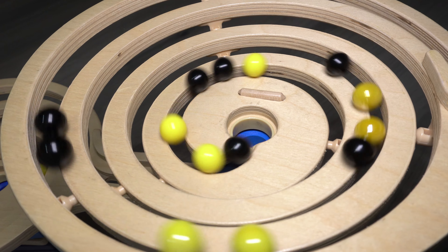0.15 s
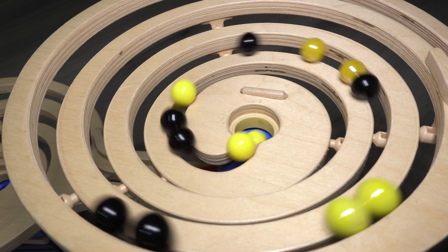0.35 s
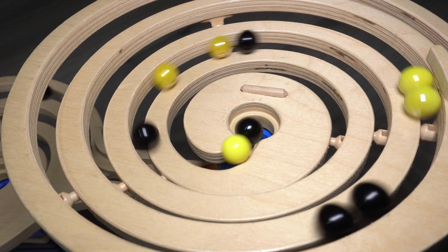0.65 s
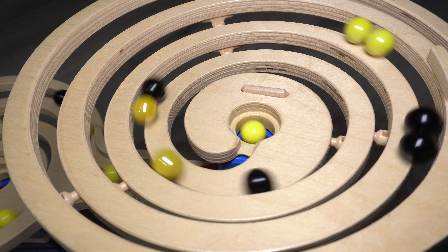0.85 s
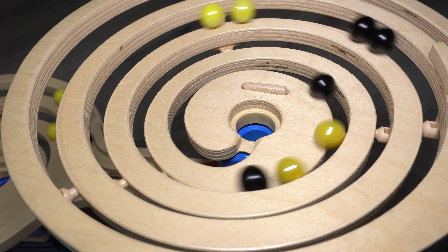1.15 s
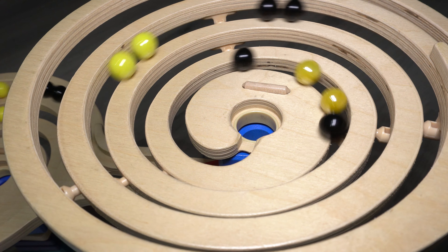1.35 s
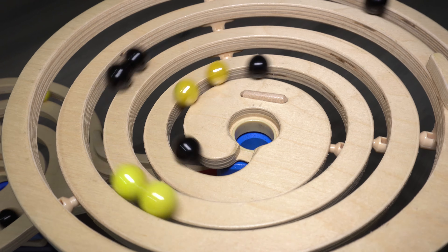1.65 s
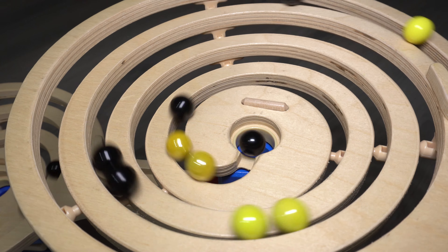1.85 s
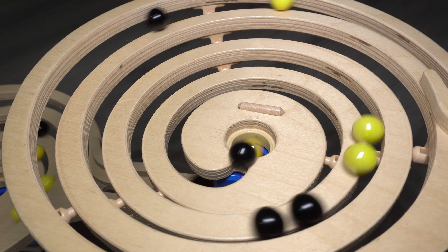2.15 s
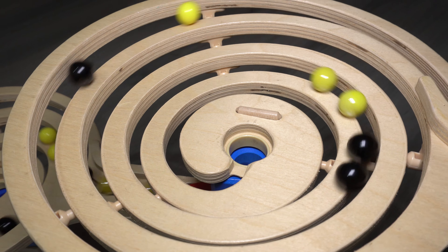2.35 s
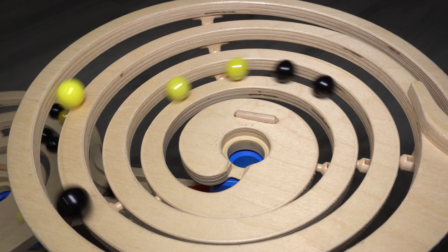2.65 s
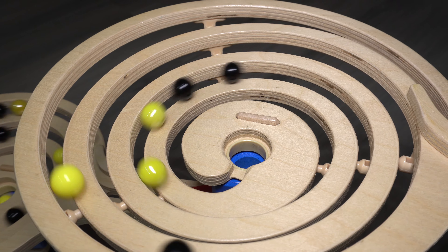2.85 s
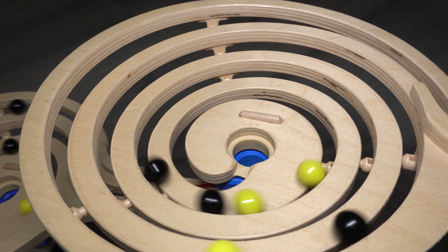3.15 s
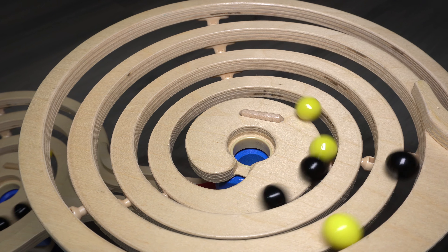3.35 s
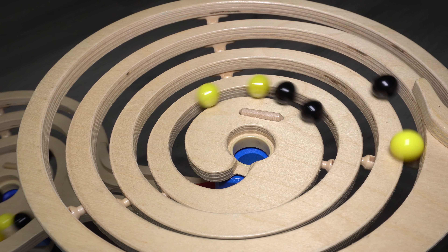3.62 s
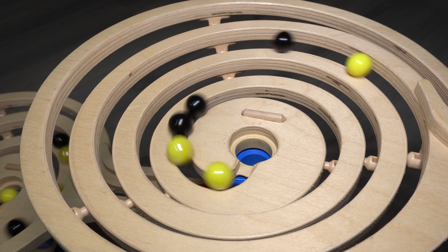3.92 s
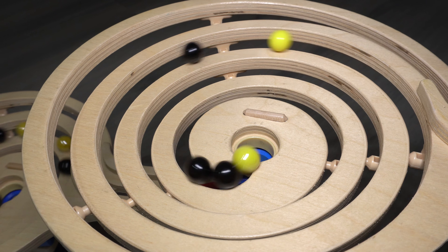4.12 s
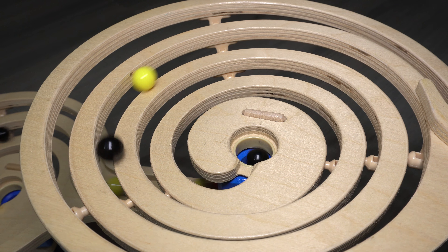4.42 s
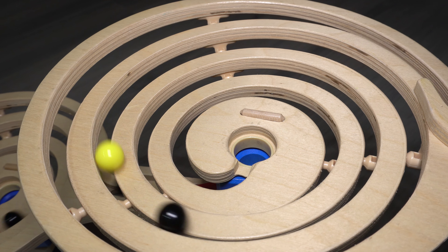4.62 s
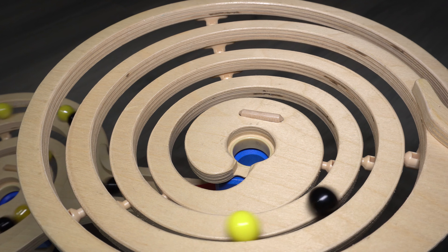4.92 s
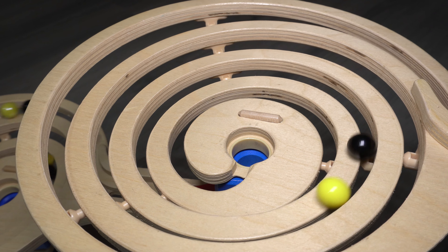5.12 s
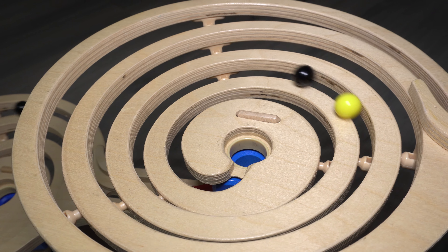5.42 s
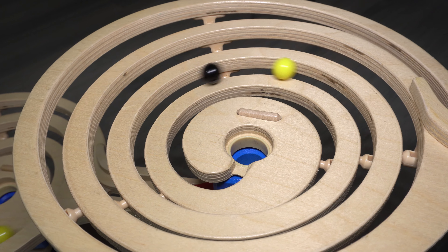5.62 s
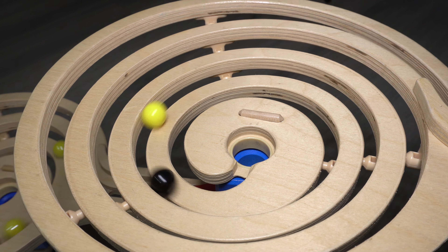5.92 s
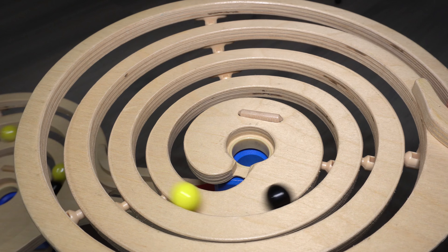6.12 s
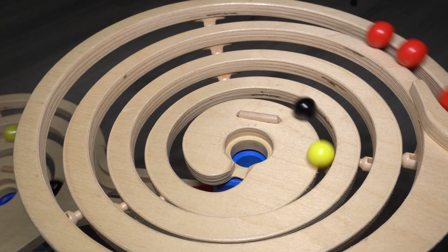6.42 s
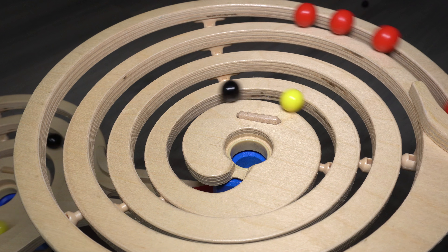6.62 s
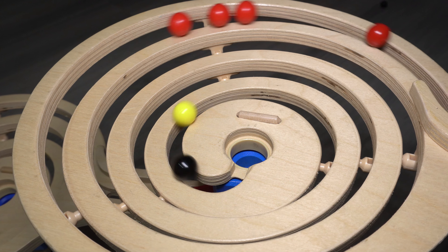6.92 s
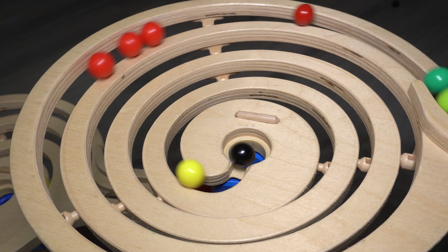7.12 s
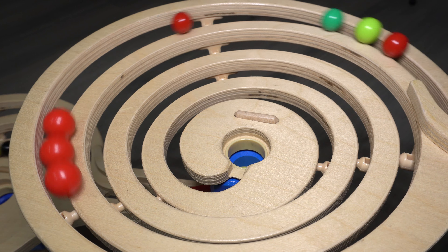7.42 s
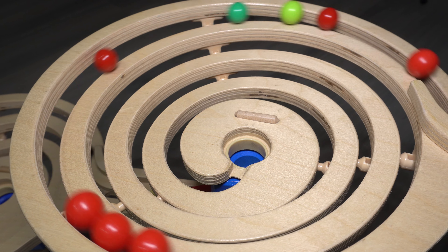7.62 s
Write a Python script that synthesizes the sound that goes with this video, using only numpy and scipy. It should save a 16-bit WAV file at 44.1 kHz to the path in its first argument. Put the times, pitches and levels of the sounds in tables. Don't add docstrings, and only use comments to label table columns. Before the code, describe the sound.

Close, busy clicking and clacking of glass marbles over rumbling plywood, thinning midway, then picking up again as more marbles clink in.

```python
import sys
import numpy as np
from scipy import signal
from scipy.fft import rfft, irfft
from scipy.io import wavfile
from scipy.ndimage import uniform_filter1d

SR = 44100
rng = np.random.default_rng(int(sys.argv[2]) if len(sys.argv) > 2 else 0)


def nominal_scale(level):
    x = np.asarray(level, float) / 20
    return 10 ** x


def generate_wav(sig):
    pcm = np.round(np.clip(np.atleast_2d(sig).T, -1, 1) * 32767).astype(np.int16)
    wavfile.write(sys.argv[1], SR, pcm)


N = 342216
T = np.arange(N) / SR

INNER_RAIL_HZ = 7100
INNER_SPREAD = 0.008
CRACK_RING_DB = -24

# pitch_hz, width_hz, level_db
BOARD_MODES = [(527, 220, -6), (820, 145, 1.5), (966, 120, 1), (1340, 170, -2.5), (1640, 210, -6.5),
               (2970, 500, -8)]
# pitch_hz, level_db
CRACK_TONE = [(300, -24), (1150, -9), (1650, -2), (2600, 0.5), (8000, 0.5), (10000, -4.5), (13000, -2.5),
              (16000, -7.5)]
# pitch_hz, level_db
INNER_UPPER_MODES = [(5500, -8), (8500, -13), (10000, -14), (12400, -21)]
# start_s, level_db
INNER_NEAR = [(0.0923, -12), (0.275, -30), (0.3277, -17), (0.353, -10.5), (0.367, -23), (0.38, -8),
              (0.4013, -11), (0.4128, -30), (0.8225, -9), (0.9693, -8.5), (2.139, -12.5), (2.1517, -24),
              (2.2396, -6), (2.2912, -10), (2.3513, -10), (3.9286, -29), (4.376, -28), (4.3964, -23),
              (4.4923, -29), (4.5865, -22), (4.6012, -22), (4.711, -27), (5.2583, -14), (5.6255, -15),
              (6.001, -24), (7.2595, -6.5), (7.4403, -12.5), (7.4478, -21)]
# start_s, level_db
INNER_FAR = [(0.059, -21), (0.343, -16), (0.801, -9), (0.931, -27), (0.9993, -17), (3.755, -27),
             (3.778, -19), (3.795, -31), (4.169, -30), (4.184, -17), (5.568, -12.5), (5.86, -23),
             (5.883, -24), (5.903, -16)]
# start_s, level_db
CRACKS = [(0.491, 3), (1.2425, 3), (1.4285, 2.5), (1.7011, 2), (1.7344, -0.5), (1.8858, 1.5), (2.1765, 1.5),
          (2.4042, 2), (2.5093, 0.5), (4.7879, 1.5), (5.3981, 3), (5.4628, 4.5), (5.5339, 0.5), (5.669, 1),
          (5.7789, 2.5), (5.918, 1), (7.083, 3), (7.218, 2.5), (7.3559, 2.5), (7.639, 1.5)]
# start_s, chute_ring_db, crack_db
CLINKS = [(1.17, -10.5, -22), (1.2026, -12, -30), (1.545, -9.5, -32), (5.938, -8, -28), (5.974, -13, -16.5),
          (6.0477, -9.5, -23), (6.085, -12, -37), (6.2596, -8.5, -19), (6.31, -15, -21), (6.4334, -12, -33),
          (6.4435, -12, -36), (6.482, -16, -30), (6.802, -7, -34), (6.856, -13, -15), (6.866, -4.5, -29),
          (6.9, -20, -20), (6.9194, -10, -16.5), (6.962, -12, -17.5), (7.007, -15, -19), (7.3053, -10, -39)]


def level(x, db):
    return x * nominal_scale(db) / np.sqrt(np.mean(x ** 2))


def colour(x, points):
    hz, db = np.transpose(points)
    grid = np.linspace(1, SR / 2, 2049)
    log_gain = np.interp(np.log(grid), np.log(hz), db) * np.log(10) / 20
    cep = irfft(log_gain)
    cep[1:len(cep) // 2] *= 2
    cep[len(cep) // 2 + 1:] = 0
    response = irfft(np.exp(rfft(cep)))
    return signal.fftconvolve(x, response)[:len(x)]


def band(x, hz, width):
    return signal.lfilter(*signal.iirpeak(hz, hz / width, fs=SR), x)


def dull(x, hz):
    hz = np.clip(hz, 3000, 21000)
    return signal.sosfilt(signal.butter(2, hz, fs=SR, output="sos"), x)


def ring(hz, t60, rise):
    t = T[:int(1.2 * t60 * SR)]
    swell = 1 - np.exp(-t / rise)
    y = np.sin(2 * np.pi * hz * t) * swell * 1000. ** (-t / t60)
    return y / np.abs(y).max()


def add(out, s, x):
    i = int(s * SR)
    out[i:i + len(x)] += x[:max(len(out) - i, 0)]


def walk(rate):
    k = int(SR / rate)
    steps = np.repeat(rng.standard_normal(N // k + 1), k)
    return 1.3 * uniform_filter1d(uniform_filter1d(steps, k), k)[:N]


def ticks(rate, spread_db):
    size = np.minimum(rng.exponential(size=N), 3)
    sign = np.sign(rng.standard_normal(N))
    return (rng.random(N) < rate / SR) * sign * nominal_scale(spread_db * size)


def hum():
    # pitch_hz, level_db
    hum_tone = [(15, 5.5), (30, 2), (62, -2), (85, -20.5), (260, -37.5), (500, -22), (1200, -25.5),
                (2500, -69)]
    # time_s, level_db
    table_curve = [(0, -60), (1.5, -67), (2.5, -66), (3.3, -81), (4.4, -62.5), (5.2, -80), (5.9, -61.5),
                   (6.4, -72.5)]
    table = level(band(rng.standard_normal(N), 143, 17), 0)
    table = table * nominal_scale(np.interp(T, *np.transpose(table_curve)))
    swell_db = 2.0 * walk(7.3) - 0.7 * T
    building = colour(rng.standard_normal(N), hum_tone) * nominal_scale(swell_db)
    return level(building, -47.5) + table


def crowd():
    # time_s, rolling_weight_db, speed_brightness_db, looseness_db
    crowd_curve = [(0, -45.5, 1, -41), (.3, -41.5, -28, -47), (.6, -44.5, -17, -43), (1, -44, 2, -37),
                   (1.3, -42.5, 10, -63), (1.65, -46, 8, -52), (1.94, -50.5, -1, -49), (2.3, -43, -18, -43),
                   (3.2, -56, 1, -57.5), (3.45, -47.5, -31, -59), (3.95, -51.5, -59, -52.5),
                   (4.35, -42, -13, -39), (4.7, -47, 2, -50), (5.151, -49, -3, -61.5), (5.3, -46, -4, -49),
                   (5.9, -48.5, 7, -45.5), (6.6, -52, 3, -53), (7.2, -47.5, -15, -63)]
    s, *columns = np.transpose(crowd_curve)
    return [np.interp(T, s, c) for c in columns]


def rolling(close, weight_db, speed_db):
    # pitch_hz, width_hz, level_db
    outer_modes = [(429, 68, -7), (548, 83, -3.5), (713, 310, 5), (1277, 510, 3), (1760, 1100, -35)]
    # pitch_hz, level_db
    grain_tone = [(710, -57), (1200, 0), (1720, 1), (2980, 4), (3700, 1), (8170, 0), (14500, -26.5),
                  (16000, -20)]
    near_board = sum(nominal_scale(db + 2.04 * walk(15)) * band(ticks(3000, 5.9), hz, w) / np.sqrt(w)
                     for hz, w, db in BOARD_MODES)
    outer = sum(nominal_scale(db + 2 * walk(13)) * band(ticks(2000, 8.1), hz, w) / np.sqrt(w)
                for hz, w, db in outer_modes)
    hiss = level(colour(ticks(9000, 4.8) * nominal_scale(1.7 * walk(40)), grain_tone), -8.0)
    far_hz = 8040
    far_outer = level(dull(dull(outer, far_hz), far_hz), 0)
    far_hiss = dull(dull(hiss, far_hz), far_hz)
    near = close * level(near_board, 0.12) + nominal_scale(12.5) * close * hiss
    return near + nominal_scale(weight_db) * far_outer + nominal_scale(weight_db + speed_db) * far_hiss


def rattling(close, loose_db):
    # pitch_hz, t60_s, level_db
    rail_modes = [(2300, .006, -9), (4400, .005, -12), (10000, .008, -27), (12300, .005, -33)]
    taps = ticks(170, 4)
    shudder = taps + .2 * rng.standard_normal(N) * signal.lfilter([1], [1, -.975], np.abs(taps))
    rattle = level(dull(dull(colour(shudder, CRACK_TONE), 6500), 7500), -1)
    for hz, t60, db in rail_modes:
        shared = taps * rng.standard_normal(N)
        rattle = rattle + level(signal.fftconvolve(shared, ring(hz, t60, .0004))[:N], db)
    return (nominal_scale(loose_db) + nominal_scale(-14.5) * close) * rattle


def inner_rattling(loose_db):
    # start_s, end_s
    inner_spells = [
        (0, 1.1),
        (3.72, 4.75),
        (5.53, 5.95),
        (7.4, 7.46),
    ]
    t60 = 0.012
    inner = sum(signal.fftconvolve(ticks(45, 4), ring(INNER_RAIL_HZ * k, t60, 0.001))[:N]
                for k in (.955, .99, 1.03))
    for hz, db in INNER_UPPER_MODES:
        inner = inner + nominal_scale(db) * signal.fftconvolve(ticks(160, 5), ring(hz, t60, .0006))[:N]
    busy = sum((T > a) & (T < b) for a, b in inner_spells)
    inner = inner * nominal_scale(-22 * (1 - busy))
    return nominal_scale(loose_db - 5) * level(inner, -12.0)


def hits():
    # start_s, level_db, pitch_hz
    outer_near = [(0.029, -9.5, 4200), (0.2265, -21, 5500), (0.4484, -25, 6400), (0.4757, 2.5, 6300),
                  (0.562, -18, 2970), (0.586, -3.5, 3960), (0.851, -15, 4530), (0.865, -4, 3900),
                  (1.048, -22, 4800), (1.157, -13, 4550), (1.1712, -13, 5600), (1.376, -13, 4540),
                  (1.628, -13.5, 7800), (1.73, -10, 7800), (2.125, -19, 1600), (3.031, -22, 7100),
                  (3.216, -28, 8300), (3.6, -21, 8050), (3.73, -24, 5330), (3.746, -23, 5360),
                  (3.85, -14, 5130), (4.002, -15, 7640), (4.0437, -22, 5400),
                  (4.1002, -8, 4430), (4.124, -19, 3780), (4.272, -5, 5300), (4.289, -19, 5060),
                 (4.311, -13.5, 4570), (4.3482, -2.5, 6020), (4.4298, -7, 2300), (4.4696, -18, 5900),
                 (5.1924, -11.5, 4660), (5.2292, -9, 8300), (5.238, -18, 7400), (5.25, -17, 8250),
                 (5.388, -20, 8350), (5.4684, -4, 4080), (5.58, -12, 8400), (5.6557, -27, 4570),
                 (5.75, -15, 2980), (5.862, -7, 2950), (6.2057, -16, 5000), (6.7114, -17, 3200),
                 (6.9544, -15, 8750), (7.0803, -15, 4500), (7.108, -5, 7700), (7.7037, -6, 2200)]
    # start_s, level_db, pitch_hz
    outer_far = [(0.0786, -11.5, 2400), (0.144, -22, 4800), (0.173, -19, 6200), (0.2895, -21, 3700),
                 (0.5479, -5, 2800), (0.6578, -12.5, 2920), (0.684, -11, 6900), (0.7316, -17.5, 6400),
                 (0.766, -13.5, 4730), (1.117, -19.5, 4630), (1.1957, -14, 4600), (1.412, -16, 7940),
                 (1.4973, -17, 8400), (1.544, -15.5, 5430), (1.59, -19.5, 4660), (1.962, -29, 1540),
                 (2.212, -5.5, 2800), (2.2466, -3.5, 3980), (2.2745, -3, 7800), (2.2975, -3.5, 1810),
                 (2.569, -8, 2570), (2.6357, -8.5, 3000), (2.9975, -8.5, 7860), (3.2942, -22, 4860),
                 (3.4334, -20, 4160), (3.5187, -19, 3440), (3.559, -18, 7840), (3.639, -12.5, 4200),
                 (3.822, -20.5, 7650), (3.982, -21.5, 3800),
                 (4.154, -23, 2400), (4.3363, -14, 2220), (4.4586, -23, 4970), (5.075, -30, 4100),
                (5.248, -22, 4660), (5.2785, -12, 4500), (5.599, -9.5, 5000), (6.109, -15, 4730),
                (6.194, -22.5, 3470), (6.2334, -8.5, 8300), (6.351, -12, 8070), (6.611, -26.5, 2880),
                (6.629, -24, 5670), (6.693, -23, 3170), (7.049, -20, 7500)]
    rows = [(s, db, 5600, CRACK_RING_DB, -10.5) for s, db in CRACKS]
    rows += [(s, db, 8400, -14, -4.5) for s, _, db in CLINKS]
    slope = 0.49
    sides = ((INNER_NEAR, outer_near, -18.5), (INNER_FAR, outer_far, -8))
    for inner, outer, room_db in sides:
        shift = 1 + INNER_SPREAD * rng.standard_normal(len(inner))
        for (s, db), k in zip(inner, shift):
            rows.append((s, db, INNER_RAIL_HZ * k, -11 - slope * db, room_db))
        for s, db, hz in outer:
            rows.append((s, db, hz, min(-14 - slope * db, -5), room_db))
    return sorted(rows)


def rail_ring(hz, chance):
    tone = np.zeros(len(chance))
    add(tone, .0003, ring(hz, .008, .0006))
    partner_hz = hz * 1.8 if hz < 4600 else hz / 1.8
    add(tone, .0002, nominal_scale(-21.5) * ring(partner_hz * nominal_scale(0.7 * chance[-1]), 0.027, 0.00085))
    return tone * (1 + 0.54 * uniform_filter1d(chance, size=9))


def knocks():
    near, far = np.zeros(N), np.zeros((4, N))
    t = T[:SR // 50]
    rows = hits()
    chances = rng.standard_normal((len(rows), len(t)))
    click = colour(1. * (t == 0), CRACK_TONE)
    for k, (s, db, hz, ring_db, room_db) in enumerate(rows):
        push = .12 * chances[k] * np.exp(-t / .0015)
        push[0] += 1
        push[int(.00026 * SR)] += .15
        push[int(.00052 * SR)] += 0.67 * min(nominal_scale(room_db + 11), 1)
        on_inner = abs(hz / INNER_RAIL_HZ - 1) < 2 * INNER_SPREAD
        top_hz = 12000 * nominal_scale(0.26 * (db - ring_db) - 4.5 * on_inner)
        crack = dull(np.convolve(push, click[:SR // 200])[:len(t)], top_hz)
        peak = np.abs(crack).max()
        tone = nominal_scale(ring_db) * rail_ring(hz, chances[k])
        size = nominal_scale(db - 3.0) / max(1, nominal_scale(ring_db))
        add(near, s + 0.00033, size * (crack / peak + tone))
        wall_hz = top_hz * nominal_scale(-2 * (ring_db > CRACK_RING_DB))
        to_walls = 1.5 * dull(click, wall_hz) / peak + .25 * tone
        add(far[k % 4], s + .0005, size * nominal_scale(room_db) * to_walls)
    return near, far


def room(x):
    # pitch_hz, t60_s
    room_decay = [(600, 0.98), (1200, 0.14), (2200, 0.47), (4000, 0.44), (7500, 0.36), (14000, 0.24)]
    t = T[:SR // 2]
    tail = 0
    for hz, t60 in room_decay:
        sos = signal.butter(3, [.7 * hz, 1.35 * hz], "band", fs=SR, output="sos")
        tail = tail + signal.sosfilt(sos, rng.standard_normal(len(t))) * 1000. ** (-t / t60)
    tail = tail * (1 - np.exp(-t / 0.00058)) * (1 + 2.6 * np.exp(-t / 0.038))
    return signal.fftconvolve(x, tail / np.sqrt(np.sum(tail ** 2)))[:N]


def inner_song():
    out = np.zeros(N)
    rows = INNER_NEAR + INNER_FAR
    modes = [(INNER_RAIL_HZ, 0)] + INNER_UPPER_MODES
    for (s, db), shares in zip(rows, rng.standard_normal((len(rows), len(modes)))):
        for (hz, mode_db), share in zip(modes, shares):
            tone = ring(hz * (1 + INNER_SPREAD * share), 0.052, 0.00025)
            add(out, s + 0.001097, nominal_scale(.5 * db - 31 + mode_db + 2 * share) * tone)
    return out * nominal_scale(4 * walk(150))


def light_ticks():
    # start_s, level_db, treble_over_middle_db
    tick_events = [(0.065, -28, -2), (0.1686, -31, -21), (0.2041, -23, -1), (0.2753, -29, -3),
                   (0.2883, -21, -1), (0.3433, -12, -34), (0.4197, -22, -25), (0.5275, -11, -8),
                   (0.6157, -18, -21), (0.6922, -23, 8), (0.7303, -19, 0), (0.7414, -22, -15),
                   (0.8514, -23, -25), (0.8819, -17, -11), (0.9347, -16, -4), (1.0609, -23, -5),
                   (1.0813, -28, -10), (1.124, -23, -9), (1.2024, -28, -16), (1.2299, -25, 1),
                   (1.3505, -27, -24), (1.4914, -21, -10), (1.498, -17, 6), (1.5888, -18.5, -7),
                   (1.6559, -29, -8), (1.9642, -16, -7), (2.0348, -15, -7), (2.0485, -29, -15),
                   (2.0639, -15.5, -4), (2.1419, -17, -9), (2.209, -12, -4), (2.2328, -21, -8),
                   (2.2751, -15, 6), (2.4893, -12, -4), (2.8067, -20, 2), (2.9089, -17.5, -17),
                   (2.9731, -29, 1), (3.2142, -28, 1), (3.3928, -30, 4), (3.5095, -41, -14),
                   (3.5192, -10, -4), (3.7367, -19.5, -11), (3.8242, -21, -4), (3.9661, -27, -12),
                   (3.9827, -23, -2), (4.1562, -26, -21), (4.1855, -18, -24), (4.2102, -30, -16),
                   (4.2794, -18, -20), (4.2923, -15, -2), (4.351, -10, -26), (4.389, -23, -21),
                  (4.4565, -16, -13), (4.4929, -20.5, 2), (4.5266, -24, -18), (4.5393, -11.5, -10),
                  (4.6014, -16.5, -3), (4.684, -25.5, -11), (4.9527, -28, -11), (5.3375, -20, -22),
                  (5.3703, -30, -21), (5.5995, -22, -22), (5.6564, -18, -20), (5.6896, -16, -11),
                  (5.7376, -19, -6), (5.817, -16, 2), (5.853, -21, -13), (5.8864, -15, -3), (5.902, -14, 8),
                  (5.9355, -10, -7), (5.9696, -24, -9), (6.0018, -17.5, 2), (6.0339, -28, -3),
                  (6.0688, -19, -10), (6.1889, -27, -8), (6.1962, -29, -11), (6.2009, -25, -15),
                  (6.259, -19, -5), (6.3107, -15, 7), (6.405, -26, 4), (6.4183, -24, 6), (6.6111, -39, -28),
                  (6.639, -25.5, -29), (6.8773, -12.5, -1), (6.896, -21, -3), (7.0017, -17.5, -14),
                  (7.0626, -24, -24), (7.0739, -23, -15), (7.2146, -17, -3), (7.3775, -11.5, -24),
                  (7.4115, -22, -23), (7.4775, -17, -7), (7.5784, -10.5, -5), (7.607, -11.5, -7),
                  (7.7574, -28, -14),
                   (0.059, -21, -24), (0.175, -12, -12), (0.3428, -25, -23), (0.4843, -25, -17),
                  (0.7515, -24, 0), (0.7668, -15.5, -6), (0.793, -20, -21), (0.8076, -19, -18),
                  (0.8985, -26, -7), (0.941, -13.5, -6), (0.9835, -13, -9), (1.022, -21, 5),
                  (1.1298, -18, -8), (1.1958, -15, -16), (2.159, -18, -4), (2.2923, -15, 2),
                  (3.7275, -33, 4), (4.1676, -11.5, -24), (4.335, -21, -22), (4.344, -25, -23),
                  (4.9425, -42, 0), (5.0015, -38, -6), (6.8011, -12.5, 5), (7.441, -18, -14),
                  (7.5276, -14, -1), (7.7144, -11.5, -9)]
    out = np.zeros(N)
    rows = sorted(tick_events)
    t = T[:SR // 80]
    for (s, db, treble_db), noise in zip(rows, rng.standard_normal((len(rows), len(t)))):
        push = 0.47 * noise * np.exp(-t / 0.0015) + (t == 0)
        tilt_db = treble_db + 8
        tick = colour(push, [(900, -33), (2400, 7.0), (4500, 9.5), (8000, 8.5),
                             (10500, tilt_db - 3.5), (16000, tilt_db - 13.5)])
        tick = tick / np.abs(tick).max()
        tone = ring(INNER_RAIL_HZ * nominal_scale(.5 * noise[-1]), 0.0067, .0005)
        add(tick, .0003, nominal_scale(-11 - .5 * max(tilt_db, -12)) * tone)
        add(out, s, nominal_scale(db - 2.5) * tick / np.abs(tick).max())
    return out


def needles():
    # start_s, level_db, treble_over_middle_db
    clean_needles = [(0.092, -11.5, -5), (0.148, -12, -11), (0.2266, -15.5, -6), (0.2497, -33, -15),
                     (0.6718, -22, -9), (0.9179, -16, -12), (1.0014, -18, -8), (1.0481, -18, -8),
                     (1.0816, -21, -7), (1.582, -18, -14), (1.6128, -22, -12), (1.6286, -13.5, -12),
                     (2.3913, -22, -7), (2.401, -11, -14), (2.9671, -30, 0), (3.1293, -24, -6),
                     (3.2228, -29, -5), (3.2269, -35, -6), (3.284, -36, -5), (3.2995, -28, -14),
                     (3.3861, -24, 0), (3.4996, -35, -6), (3.559, -9, -9), (3.7952, -23, 2),
                     (4.0447, -21, -10), (4.1008, -11, -9), (4.1935, -21, -8), (4.3223, -26, -8),
                     (4.9661, -36, -8), (5.0674, -49, -5), (5.23, -13, -10), (5.259, -7, -4),
                     (5.2775, 1.5, -15.5), (5.3888, -23, -3), (5.6273, -12, -4), (5.6459, -20, -20),
                     (6.0229, -25, 1), (6.0902, -17, -7), (6.1289, -20, -7), (6.444, -12, -7),
                     (6.4832, -15, -6), (6.71, -20, -16), (6.965, -20, -10), (7.4269, -27, -10)]
    # start_s, level_db, treble_over_middle_db
    sharp_needles = [
        (0.5615, -7, -17),
        (3.8505, -12, -8),
        (4.003, -12, -11),
        (4.4296, -5, -9),
    ]
    out = np.zeros(N)
    t = T[:SR // 150]
    rows = list(clean_needles) + sharp_needles
    for (s, db, treble_db), noise in zip(rows, rng.standard_normal((len(rows), len(t)))):
        contact_hz = 8800 * nominal_scale(0.34 * treble_db)
        a = (np.pi * contact_hz * (T[:SR // 2000] - .0002)) ** 2
        push = nominal_scale(-20) * noise * np.exp(-t / 0.0016) + (t == 0)
        push[int(.0004 * SR)] += nominal_scale(-12)
        add(out, s, nominal_scale(db - 2.5) * np.convolve(push, (1 - 2 * a) * np.exp(-a)))
    return out


def crack_bodies():
    # pitch_hz, t60_s, level_db
    body_modes = [(1800, .006, -1), (2300, .005, -2), (3600, .005, -4), (3000, .004, -3), (4200, .004, -2),
                  (5400, .004, -2), (7700, .006, -1), (8700, .005, -2)]
    out = np.zeros(N)
    t = T[:SR // 300]
    chance = rng.standard_normal((len(CRACKS), len(body_modes), len(t)))
    for (s, db), rows in zip(CRACKS, chance):
        for (hz, t60, mode_db), shake in zip(body_modes, rows):
            push = (shake * np.exp(-t / .0004) + 5 * (t == 0)) / 5
            tone = ring(hz * (1 + .015 * shake[-1]), t60, .0002)
            add(out, s + .0005, nominal_scale(db + mode_db - 18) * np.convolve(push, tone))
    return out


def pings():
    # start_s, level_db, pitch_hz, t60_s
    ping_events = [(0.547, -24, 2840, 0.065), (5.862, -28, 2850, 0.034), (6.235, -42, 3984, 0.55),
                   (6.236, -45, 5297, .4), (6.352, -42, 5340, 0.35), (6.711, -40, 2930, 0.12),
                   (6.712, -41, 3780, 0.088), (6.352, -44, 3990, 0.35), (6.262, -44, 3090, .25),
                   (1.328, -43.5, 318, 0.19), (3.744, -40, 5400, .16)]
    out = np.zeros(N)
    for s, db, hz, t60 in ping_events:
        add(out, s, nominal_scale(db) * ring(hz, t60, .002))
    return out * nominal_scale(1.1 * walk(60))


def clinks():
    # pitch_hz, t60_s, level_db
    chute_modes = [(2930, .07, -20), (4300, .014, -2), (5400, .15, -26), (5750, .016, 0), (8500, .010, -7),
                   (10500, .006, -15)]
    out = np.zeros(N)
    t = T[:SR // 80]
    chance = rng.standard_normal((len(CLINKS), len(t)))
    for (s, db, _), noise in zip(CLINKS, chance):
        body = np.zeros(SR // 5)
        for (hz, t60, mode_db), share in zip(chute_modes, noise):
            add(body, 0, nominal_scale(mode_db + .8 * share) * ring(hz * (1 + .01 * share), t60, .0003))
        shake = noise * np.exp(-t / 0.0038)
        add(out, s, nominal_scale(db - 31.0) * np.convolve(shake, body[:SR // 8]))
    return out


def thuds():
    # start_s, level_db, pitch_hz, t60_s
    drop_events = [
        (1.325, -32, 820, 0.04),
        (1.959, -33, 970, 0.03),
        (2.216, -35, 1004, 0.025),
        (3.433, -45.5, 875, 0.03),
        (3.517, -40, 866, 0.03),
        (5.2295, -40.5, 640, 0.018),
        (5.2775, -31.5, 940, 0.011),
        (6.953, -40.5, 670, 0.012),
    ]
    # start_s, level_db, pitch_hz
    jolt_events = [
        (1.327, -40.5, 157),
        (1.963, -33, 150),
        (2.172, -38, 73),
        (4.348, -36.5, 63),
        (5.17, -34, 59.7),
    ]
    out, blows = np.zeros(N), np.zeros(N)
    t = T[:SR // 20]
    noises = rng.standard_normal((len(drop_events), len(t)))
    for (s, db, hz, t60), noise in zip(drop_events, noises):
        add(out, s, nominal_scale(db + 11.5) * ring(hz, max(t60, .01), 0.001))
        add(blows, s, nominal_scale(db) * noise * np.exp(-t / 0.013))
    for s, db, hz in jolt_events:
        add(out, s, nominal_scale(db) * ring(hz, 0.065, 0.0022))
    return out + nominal_scale(11.5) * sum(nominal_scale(db) * band(blows, hz, 1.9 * w) for hz, w, db in BOARD_MODES)


def passes():
    # start_s, swell_s, hold_s, level_db, fade_db_per_s
    bunches = [
        (1.952, 0.033, 0.02, -31, 136),
        (2.174, 0.069, 0.015, -34.5, 115),
        (2.42, 0.09, 0.23, -36, 43),
        (3.467, 0.087, .02, -40, 47),
        (7.424, 0.085, .4, -35.5, 40),
    ]
    gain = 0
    for s, swell, hold, db, fade_db in bunches:
        before = np.maximum(s + swell - T, 0) / swell
        after = np.maximum(T - s - swell - hold, 0)
        gain = gain + nominal_scale(db - 19.5 * before - fade_db * after)
    return gain


def scene():
    near, far = knocks()
    drops, chute, bodies = thuds(), clinks(), crack_bodies()
    touches, points = light_ticks(), needles()
    close = passes()
    weight_db, speed_db, loose_db = crowd()
    roll = rolling(close, weight_db, speed_db)
    rattle = rattling(close, loose_db) + inner_rattling(loose_db)
    to_room = nominal_scale(-13) * drops + nominal_scale(-14) * rattle + nominal_scale(-14) * chute
    to_room = to_room + nominal_scale(-9.0) * bodies + nominal_scale(-10) * touches + nominal_scale(-5) * points
    wet = nominal_scale(9.0) * sum(room(place) for place in far) + room(to_room)
    near = near + bodies + touches + points + pings() + inner_song()
    return (near + drops + chute + roll + rattle + wet + hum())[None]


def top_cut(x):
    return signal.sosfilt(signal.butter(12, 16810, fs=SR, output="sos"), x)


def record(dry):
    soft = np.tanh(1.097 * dry) / 1.217
    cut = signal.sosfilt(signal.ellip(8, .2, 40, 15800, fs=SR, output="sos"), soft)
    return top_cut(cut)


dry = scene()
out = record(dry)
generate_wav(out)
```